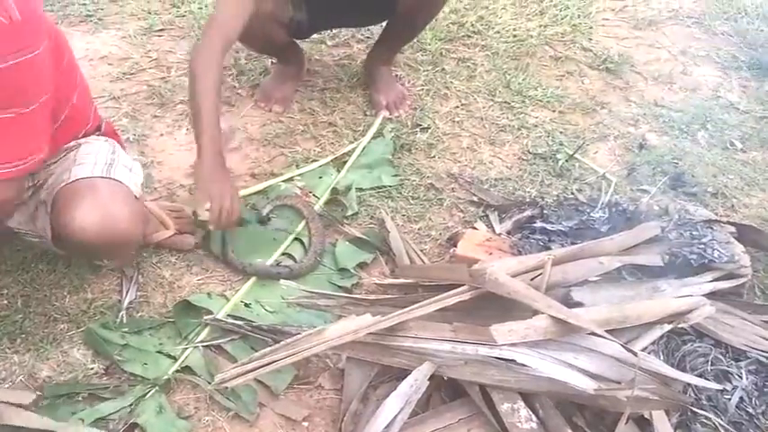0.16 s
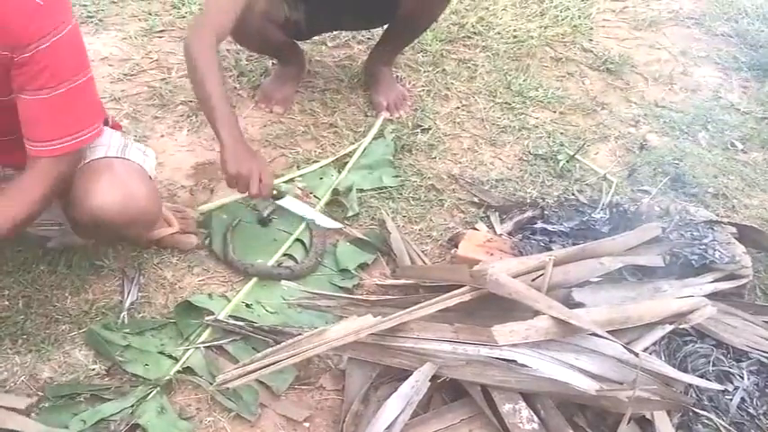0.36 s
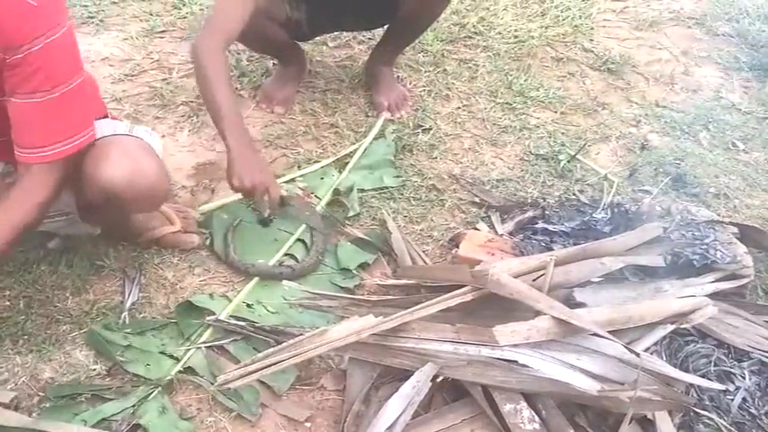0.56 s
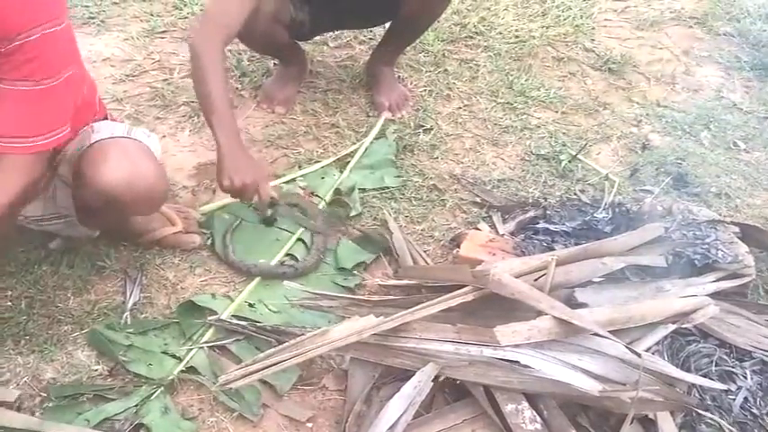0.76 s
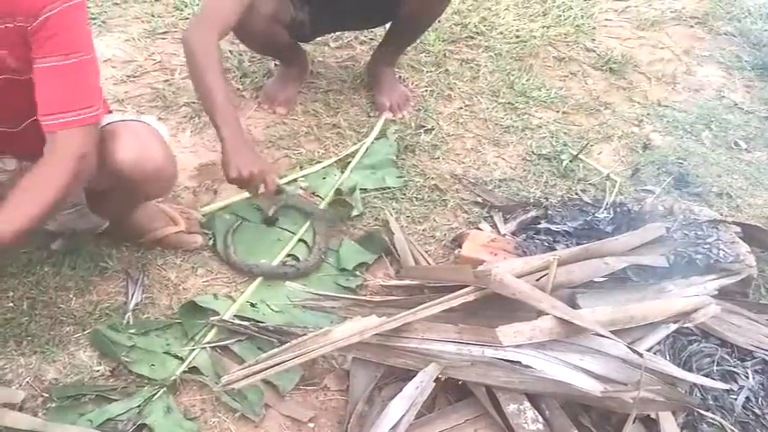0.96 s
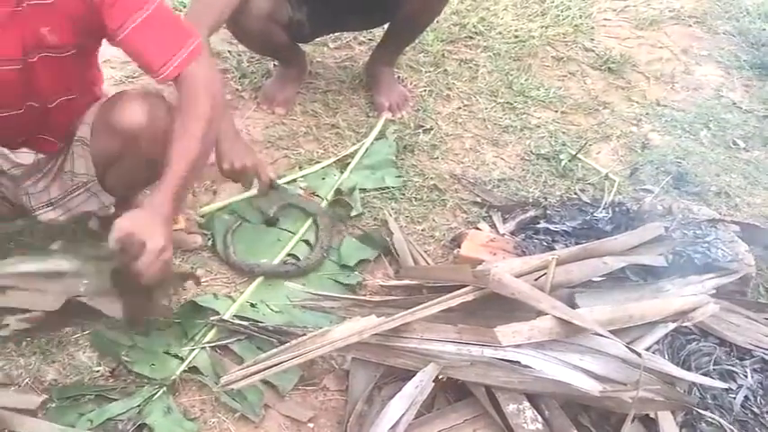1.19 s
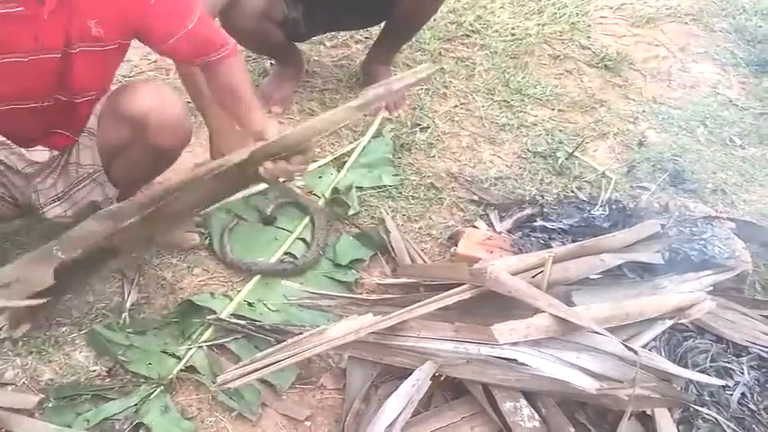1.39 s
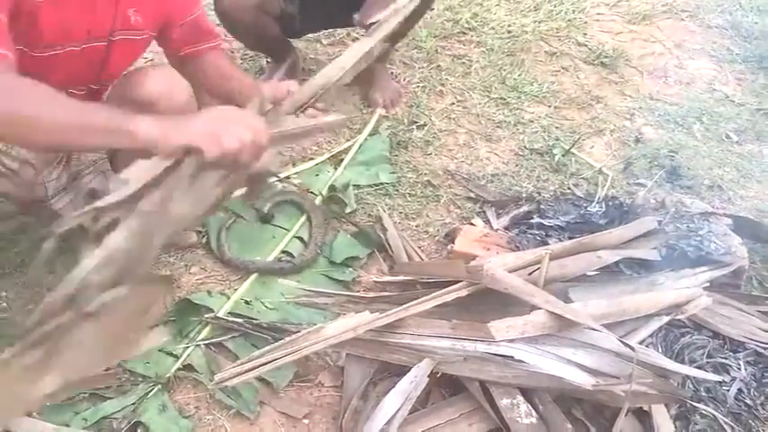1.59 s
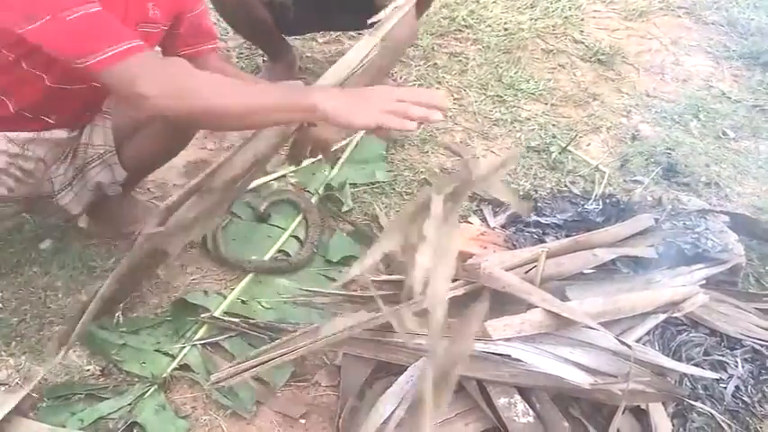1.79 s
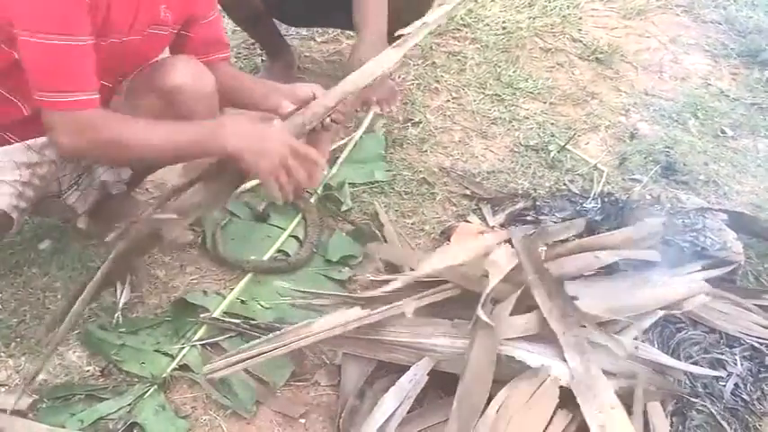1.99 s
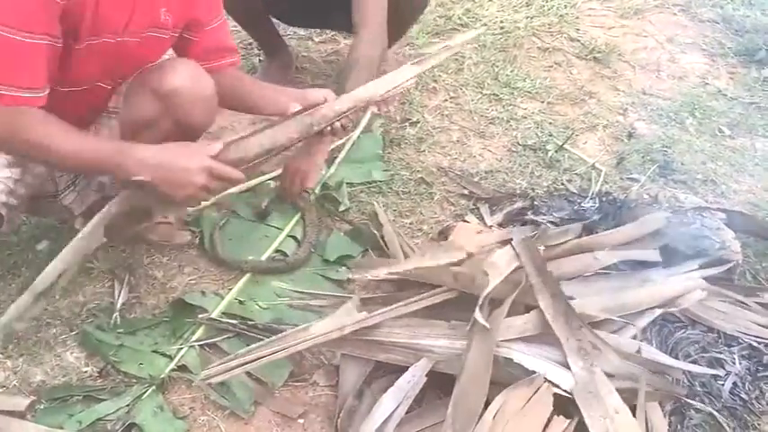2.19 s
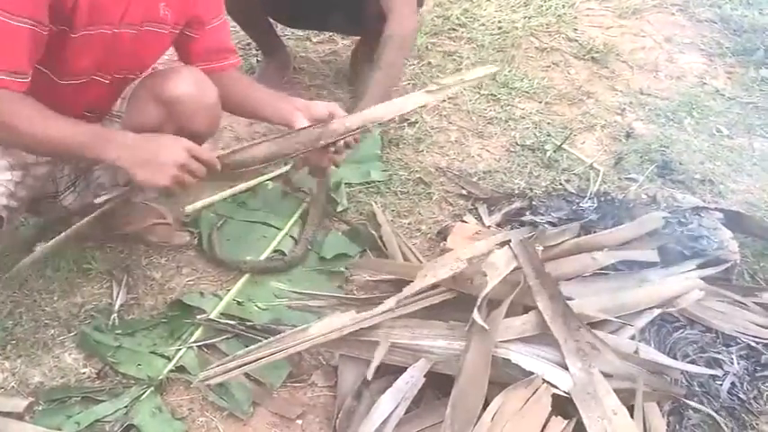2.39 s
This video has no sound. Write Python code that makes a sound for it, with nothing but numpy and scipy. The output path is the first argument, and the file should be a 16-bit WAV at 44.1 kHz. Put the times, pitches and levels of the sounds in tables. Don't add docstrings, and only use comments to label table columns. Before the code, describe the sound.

Brittle dried leaves being gripped and torn in crisp crackling bursts, over faint open-air hiss

```python
import sys
import numpy as np
from scipy import signal
from scipy.fft import rfft, irfft, next_fast_len
from scipy.io import wavfile
from scipy.ndimage import map_coordinates

SR = 44100
rng = np.random.default_rng(int(sys.argv[2]) if len(sys.argv) > 2 else 0)


def field_ratio(decibels):
    return 10 ** (np.asarray(decibels, dtype=float) / 20)


def bounce(signal):
    frames = np.transpose(np.atleast_2d(signal))
    limited = np.clip(frames, -1, 1)
    pcm = np.round(limited * 32767).astype(np.int16)
    wavfile.write(sys.argv[1], SR, pcm)


N = 108045

SPLIT_HZ = 4420

EARLY_SNAP_TIMES = [.026, .181, .304, .425, .519, .548, .616, .678, .710, .737, .818, .871, .909, .955,
                    .971, .987, 1.036, 1.1125, 1.166, 1.193, 1.201, 1.228]
LATE_SNAP_TIMES = [1.271, 1.284, 1.352, 1.379, 1.422, 1.448, 1.495, 1.584, 1.594, 1.613, 1.689, 1.717,
                   1.812, 1.822, 1.895, 1.922, 1.949, 2.028, 2.099, 2.172, 2.210, 2.326, 2.413]
# [peak level/dB, length/s, ring f/Hz, dull share/dB]
SNAPS = [(-36, 0.0014, 4300, 2), (-29.5, 0.0011, 3200, -5), (-42, .001, 1700, 0),
         (-12, 0.0015, 5200, -1), (-21, 0.0025, 5600, 7), (-24.5, 0.00097, 9200, -8),
         (-31.5, 0.0019, 3900, -15), (-36, 0.0013, 3700, -18), (-32, 0.0012, 6200, -4),
         (-32, 0.0018, 9200, 0), (-33, .001, 12000, -3.5), (-22, 0.0031, 2930, 10),
         (-32, 0.0013, 9000, -2), (-25, 0.002, 7300, 3), (-19, 0.0033, 2000, -11),
         (-26, 0.003, 6000, -2), (-38, 0.0026, 1150, 9), (-19, 0.0043, 6300, 1),
         (-22.5, .0013, 7000, -16), (-16.5, 0.0033, 1960, 9), (-13.5, 0.0037, 3900, -8),
         (-35, .0014, 5400, -6),
         (-27.5, 0.0026, 1040, 0), (-23.5, 0.002, 1660, 5), (-12.5, 0.0044, 5640, 0),
              (-38, .0015, 5900, 2), (-31.5, 0.01, 4200, 15), (-33.5, 0.0024, 5800, 8),
              (-29.5, 0.0046, 2760, 13), (-37, 0.0023, 3500, 0), (-31.5, 0.0032, 5500, 6),
              (-33, 0.01, 4800, 13), (-51, 0.0033, 2700, -5), (-39.5, 0.0019, 1060, 7),
              (-27.5, 0.0064, 4000, 9), (-27.5, 0.0047, 1160, -4), (-31.5, 0.0018, 2130, -9),
              (-38, 0.0013, 2300, 1), (-38, 0.0019, 4500, -5), (-23, .0015, 5000, 11),
              (-40, 0.0011, 1880, 4), (-30.5, 0.0038, 1720, -1), (-27.5, 0.0064, 6100, 5),
              (-31.5, 0.0022, 2600, -2), (-43, 0.0056, 890, 12)]
# [t/s, peak level/dB, length/s, ring
# f/Hz, dull share/dB]
TEARS_AND_TICKS = [(0.265, -33, 0.033, 6400, 19), (0.415, -20, 0.006, 5700, 3), (0.409, -26.5, 0.015, 1770, -7),
                   (0.431, -25, 0.016, 3500, 5), (0.458, -18, 0.022, 5600, 11), (0.476, -21.5, 0.011, 2920, 0),
                   (1.09, -31, 0.028, 3840, -2), (1.178, -18.5, 0.005, 1790, -8), (1.3192, -16, 0.0091, 6000, 3),
                   (1.363, -42, 0.011, 6560, -10), (1.496, -32.5, 0.019, 794, 10.5),
                   (1.822, -54, 0.0087, 2270, 13), (1.957, -37.5, 0.027, 3760, 12.5),
                   (2.024, -36, 0.0049, 930, 19.5), (2.037, -33.5, 0.026, 3500, 15),
                   (2.107, -39.5, 0.018, 1840, 24.5),
                   (.093, -33.5, 0.0013, 5960, 4), (0.346, -39, .001, 9000, 2),
                 (0.418, -17.5, 0.0033, 5900, -5), (0.435, -27, 0.0037, 3960, 7),
                 (0.4645, -21, 0.0041, 7100, -3), (0.4798, -17, 0.0016, 1130, -13.5),
                 (.4835, -18.5, 0.0061, 5150, -2), (0.491, -38, 0.0026, 5000, -7),
                 (0.847, -46, 0.0034, 3970, 2), (0.933, -40, 0.0045, 6000, 0),
                 (1.1833, -14, 0.0051, 1830, -7), (1.218, -39, .002, 9000, -8),
                 (1.292, -21, 0.0018, 7000, 0), (1.33, -16.5, 0.0047, 6200, 4),
                 (1.342, -22, 0.0025, 4400, -2), (1.833, -36, .012, 3420, 5), (1.962, -34, 0.0034, 5640, 8),
                 (2.017, -36, .0015, 6000, 0), (2.062, -37, .004, 2530, -6), (2.073, -32, .005, 6200, -3),
                 (2.109, -41, .005, 1490, 9), (2.294, -40.5, 0.012, 1350, 5),
                 (0.057, -35.5, 0.043, 1800, 5), (0.35, -34.5, 0.011, 796, 8),
                 (0.418, -23.5, 0.011, 686, 3), (0.456, -30.5, 0.036, 233, 10),
                 (0.576, -37, 0.026, 1200, 2), (1.102, -30.5, 0.0055, 1500, 3),
                 (1.26, -24, 0.0098, 6500, 0), (1.296, -34, 0.0038, 2200, -5),
                 (1.355, -25.5, 0.0025, 620, 10), (1.409, -38, 0.016, 774, 12),
                 (1.737, -44.5, 0.013, 1130, 13), (2.122, -30, .001, 3520, 8),
                 (2.146, -35, 0.0028, 4200, 6), (2.155, -39, 0.0025, 2500, 0),
                 (2.232, -33, 0.0044, 2200, 8)]
# [t/s, peak level/dB, length/s, ring f/Hz, dull share/dB]
LONE_CRACKS = [
    (.3035, -31, .0003, 1800, 3),
    (.7372, -26, .0004, 9200, -6),
    (1.2843, -13, .0002, 6300, -3),
    (1.2865, -18, .0002, 7000, -3),
    (1.3795, -26, .0003, 6300, 0),
    (1.53, -35, .0004, 2100, 4),
    (2.099, -31, .0003, 1900, 5),
]
# [f/Hz, level/dB]
BLADE_TONE = [(120, 2), (200, -9), (659, -9.5), (763, -4), (1100, -4), (4860, -9), (5630, -6.5),
              (12200, -9.5), (16000, -1.5)]
BURST_CRACKS_PER_S, BURST_SPREAD_DB, BURST_DB = 16000, 2, -7.5
ATTACK_S, RISE_SHARE = .0002, .072
RELEASE_S, RELEASE_SHARE, TAIL_DB, TAIL_S = .0006, .25, -17, .012
SAG_DB = 5
FIRST_CRACK_DB, CRACK_FADES_S = 17, .0007
RING_DB, SECOND_RING_DB, RING_Q = 6, -.5, 8.1
BODY_DB, BODY_Q, BROAD_DB = 5.5, 1.62, -9


def burst_shape(t, length):
    rise = np.exp(np.minimum(t, 0) / (ATTACK_S + RISE_SHARE * length))
    sag = field_ratio(-SAG_DB * np.clip(t / max(length, .004), 0, 1))
    after = np.maximum(t - length, 0)
    release = np.exp(-after / (RELEASE_S + RELEASE_SHARE * min(length, .008)))
    tail = field_ratio(TAIL_DB) * np.exp(-after / TAIL_S)
    return rise * sag * (release + tail)


def flap_ring(x, hz, db):
    return field_ratio(db) * np.sqrt(8000 / hz) * resonance(x, hz, hz / RING_Q)


def bursts():
    fibre = cracks(BURST_CRACKS_PER_S, BURST_SPREAD_DB)
    snap_times = EARLY_SNAP_TIMES + LATE_SNAP_TIMES
    snaps = [(s, *snap) for s, snap in zip(snap_times, SNAPS)]
    grips = snaps + TEARS_AND_TICKS + LONE_CRACKS
    second_flaps = 1000 * 12 ** rng.random(len(grips))
    out = np.zeros(N)
    for (s, db, length, hz, dull_db), second_hz in zip(grips, second_flaps):
        start = int(s * SR) - 220
        end = min(start + 4400, N)
        t = np.arange(start, end) / SR - s
        grip = burst_shape(t, length) * fibre[start:end]
        grip[230] += field_ratio(FIRST_CRACK_DB) * np.exp(-length / CRACK_FADES_S)
        grip = field_ratio(db) * grip
        broad = field_ratio(BROAD_DB) * dull(grip, dull_db)
        body = field_ratio(BODY_DB) * resonance(grip, hz, hz / BODY_Q)
        rings = flap_ring(grip, hz, RING_DB) + flap_ring(grip, second_hz, SECOND_RING_DB)
        out[start:end] += broad + body + rings
    return field_ratio(BURST_DB) * colour(out, BLADE_TONE)


# [t/s, rustle level/dB, dull share/dB]
HANDLING = [(0, -41.5, 1), (.14, -47, 3), (.2, -40, 3.5), (.4, -40.5, 3), (.5, -36, 0), (.62, -41.5, 0.5),
            (.85, -46, 0.5), (.97, -36.5, 2), (1.05, -44, 1.5), (1.16, -38.5, -2), (1.2, -27.5, -2.5),
            (1.375, -34, -6), (1.43, -51, 0.5), (1.55, -44, 3.5), (1.67, -54, -0.5), (2.0, -49, 0.5),
            (2.06, -35.5, 2), (2.45, -56, -1.5)]
# [f/Hz, level/dB]
RUSTLE_TONE = [(120, -33.5), (200, 1), (340, -6.5), (1840, -1), (4860, -8), (6050, -5), (7680, -11.5),
               (9230, -9), (16000, -13.5)]
RUSTLE_CRACKS_PER_S, RUSTLE_SPREAD_DB = 40000, 2.5
RUSTLE_CYCLES = 16.8
CLUMP_DB, PATCH_DB = 1.7, 2.12


def rustle():
    effort_db, dull_db = in_time(HANDLING)
    fibre = cracks(RUSTLE_CRACKS_PER_S, RUSTLE_SPREAD_DB)
    clumps = drift(19) + .58 * drift(76)
    fibre = fibre * field_ratio(CLUMP_DB * clumps)
    pitches = np.geomspace(250, 15500, 40)
    share = pitches ** .4
    dealt = rng.choice(40, N, p=share / np.sum(share))
    flaps = 0
    for k, hz in enumerate(pitches):
        width_hz = 2.16 * hz / RUSTLE_CYCLES
        ring = resonance(fibre * (dealt == k), hz, width_hz)
        ring = resonance(ring, hz, 2 * width_hz)
        flaps = flaps + field_ratio(PATCH_DB * drift(44)) * np.sqrt(hz) * rms_one(ring)
    return field_ratio(effort_db - 7) * dull(rms_one(colour(flaps, RUSTLE_TONE)), dull_db)


# [f/Hz, level/dB]
FIRE_TONE = [(15, -56), (25, -27), (50, -3.5), (85, -0.5), (115, -2.5), (160, -11), (260, -19), (400, -48)]
# [t/s, level/dB]
FLAME_LEVEL = [(0, -53), (.15, -53.5), (.3, -52), (.47, -53.5), (.6, -59), (.85, -51), (1.0, -56.5),
               (1.15, -56.5), (1.32, -51.5), (1.5, -58), (1.75, -51.5), (2.0, -57), (2.3, -53),
               (2.45, -56.5)]


def fire():
    flame_db, = in_time(FLAME_LEVEL)
    rumble = rms_one(colour(rng.standard_normal(N), FIRE_TONE))
    flicker_db = 1.5 * drift(4.4)
    return rumble * field_ratio(flame_db - 1.5 + flicker_db)


# [f/Hz, level/dB]
AIR_TONE = [(120, -25), (200, -24), (416, -1), (4860, -3.5), (6050, -2.5), (16000, -16)]


def open_air():
    return field_ratio(-68) * rms_one(colour(rng.standard_normal(N), AIR_TONE))


SWEEP_MID_MS, SWEEP_DEPTH_MS, SWEEP_PERIOD_S, SWEEP_TOP_S = 1.0, 1.0, 4.0, 1.635


def swept_copy(x):
    t = np.arange(N) / SR
    swing = np.cos(2 * np.pi * (t - SWEEP_TOP_S) / SWEEP_PERIOD_S)
    delay_ms = SWEEP_MID_MS + SWEEP_DEPTH_MS * swing
    copy = map_coordinates(x, [np.arange(N) - delay_ms * SR / 1000], order=1)
    return x + field_ratio(-4.5) * copy


def rms_one(x):
    return x / np.sqrt(np.mean(x ** 2) + 1e-20)


def in_time(rows):
    s, *columns = np.transpose(rows)
    return [np.interp(np.arange(N) / SR, s, column) for column in columns]


def at_hz(points, hz):
    point_hz, point_db = np.transpose(points)
    return np.interp(np.log(hz), np.log(point_hz), point_db)


def drift(rate):
    r = np.exp(-40 * np.pi * rate / SR)
    noise = rng.standard_normal(N // 20 + 2002)
    slow = signal.lfilter([1], [1, -2 * r, r * r], noise)[2000:]
    return np.interp(np.arange(N) / 20, np.arange(len(slow)), rms_one(slow))


def colour(x, spectrum):
    size = next_fast_len(N + 8192)
    hz = np.maximum(np.fft.rfftfreq(size, 1 / SR), 1)
    cepstrum = irfft(np.log(field_ratio(at_hz(spectrum, hz))), size)
    cepstrum[1:size // 2] *= 2
    cepstrum[size // 2 + 1:] = 0
    return irfft(rfft(x, size) * np.exp(rfft(cepstrum)), size)[:N]


def resonance(x, hz, width_hz):
    r = np.exp(-np.pi * width_hz / SR)
    top = (1 - r * r) / 2
    poles = [1, -2 * r * np.cos(2 * np.pi * hz / SR), r * r]
    return signal.lfilter([top, 0, -top], poles, x + 1e-18)


def cracks(per_s, spread_db):
    sizes = field_ratio(spread_db * np.minimum(rng.exponential(1, N), 5))
    signs = rng.choice([-1, 1], N)
    return rms_one(sizes * signs * (rng.random(N) < per_s / SR))


def dull(x, dull_db):
    low = signal.sosfilt(signal.butter(2, SPLIT_HZ, fs=SR, output="sos"), x)
    high = signal.sosfilt(signal.butter(2, SPLIT_HZ, "high", fs=SR, output="sos"), x)
    return field_ratio(dull_db) * low - field_ratio(-dull_db) * high


# [f/Hz, level/dB]
SIDE_TONE = [(60, -66), (200, -40), (1500, -29), (6000, -33), (10000, -29), (13500, -17.5), (15500, -24)]


def scene():
    no_bass = signal.butter(2, 190, "high", fs=SR, output="sos")
    leaves = signal.sosfilt(no_bass, bursts() + rustle())
    side = colour(np.roll(leaves, 37), SIDE_TONE)
    return leaves + fire() + open_air() + side * [[1], [-1]]


def roll_off(x):
    return signal.sosfilt(signal.butter(12, 16750, fs=SR, output="sos"), x)


def record(dry):
    wet = np.array([swept_copy(channel) for channel in dry])
    top_cut = signal.cheby2(12, 60, 16500, fs=SR, output="sos")
    return roll_off(signal.sosfilt(top_cut, wet))


dry = scene()
out = record(dry)
bounce(out)
```